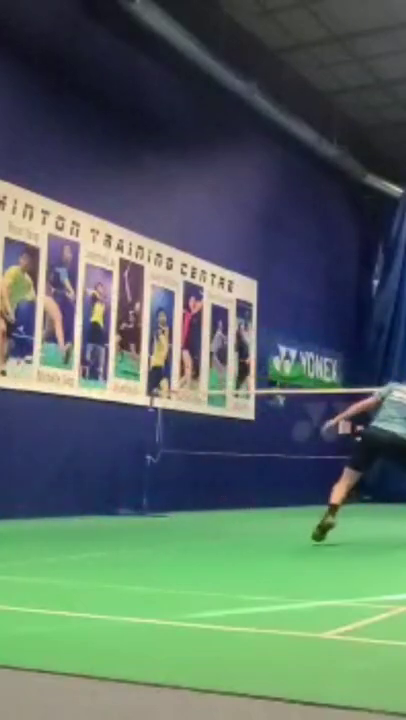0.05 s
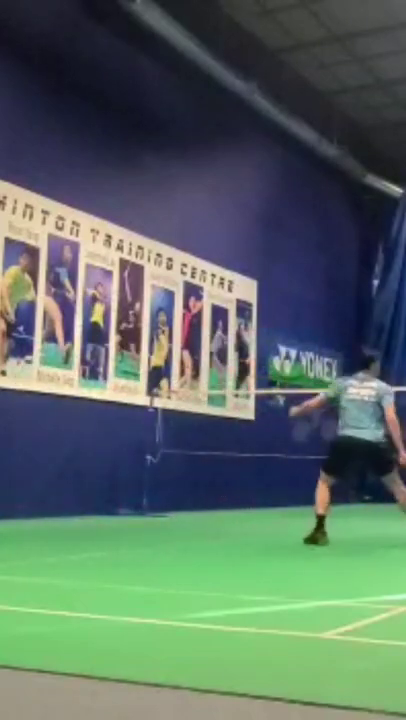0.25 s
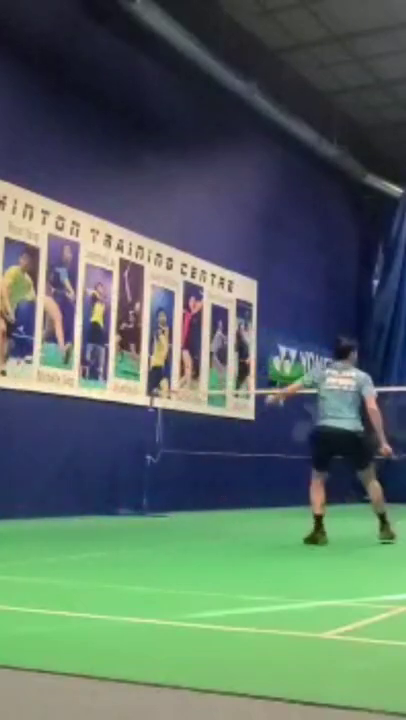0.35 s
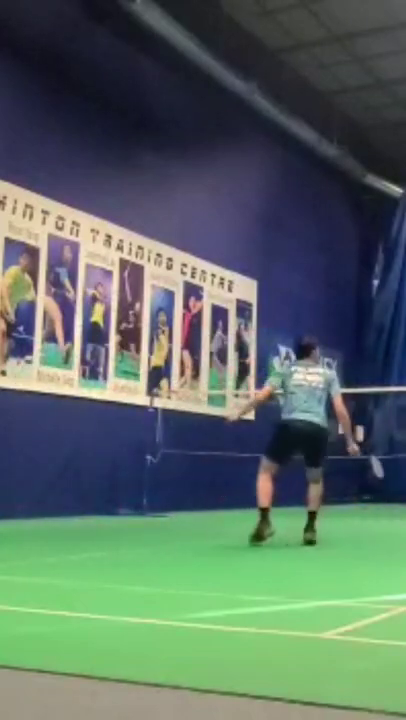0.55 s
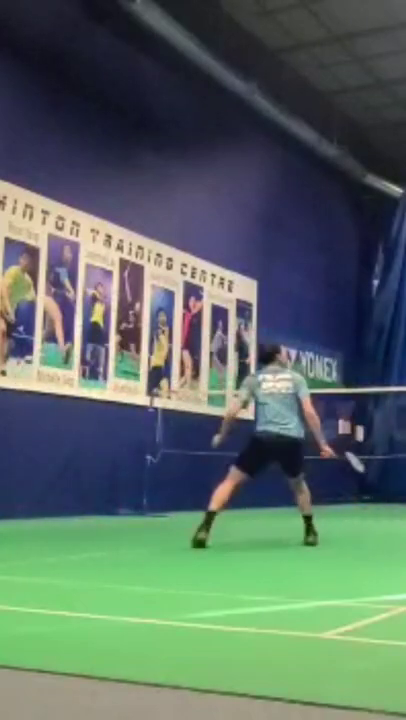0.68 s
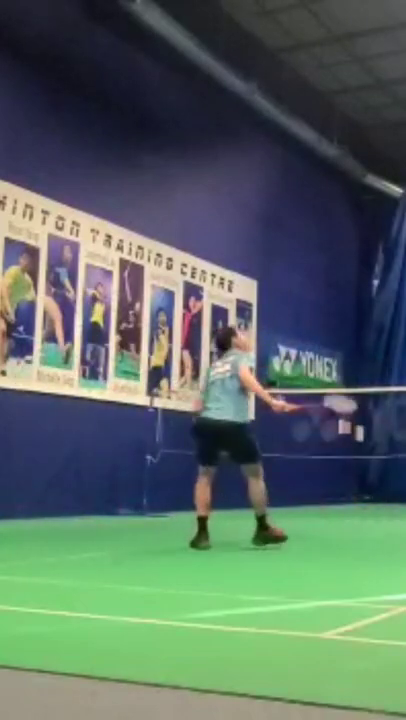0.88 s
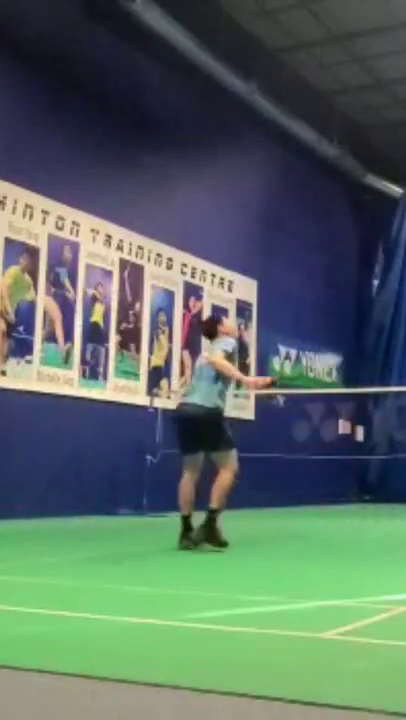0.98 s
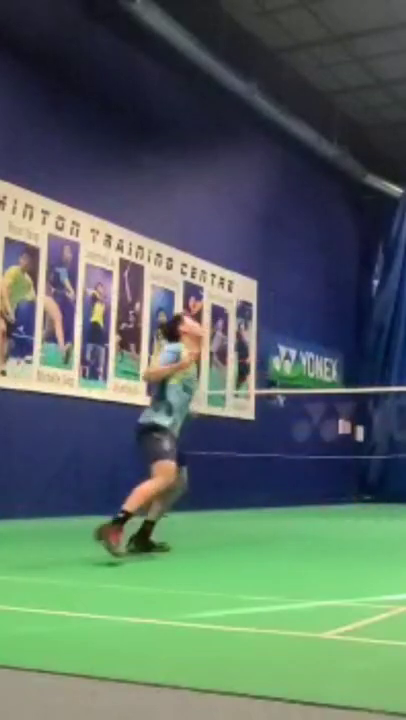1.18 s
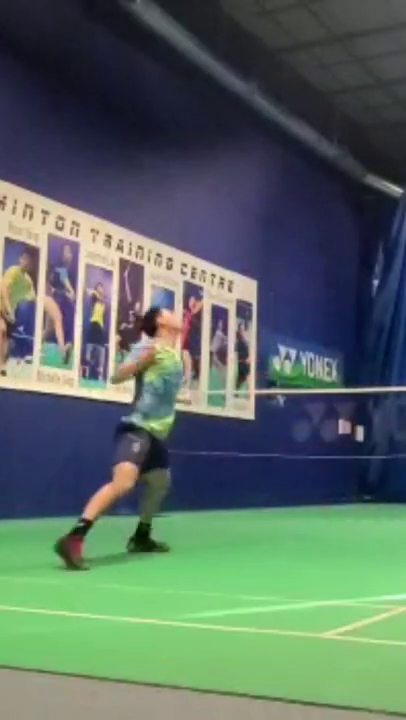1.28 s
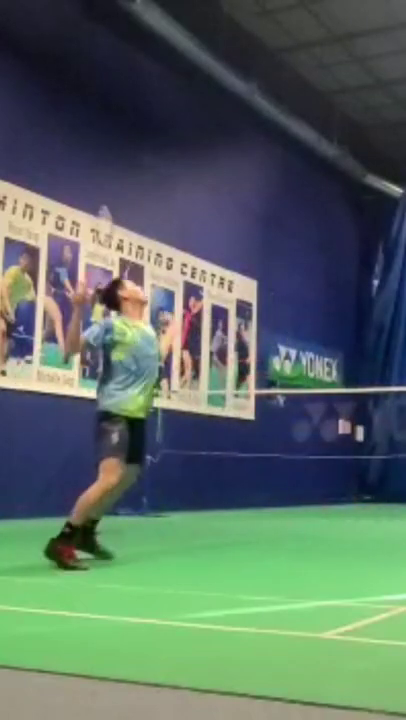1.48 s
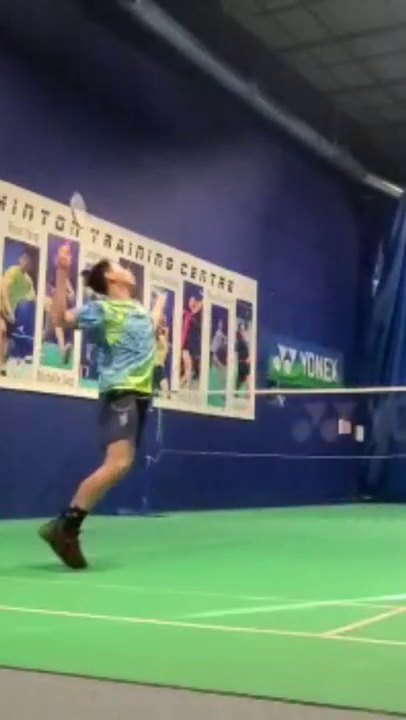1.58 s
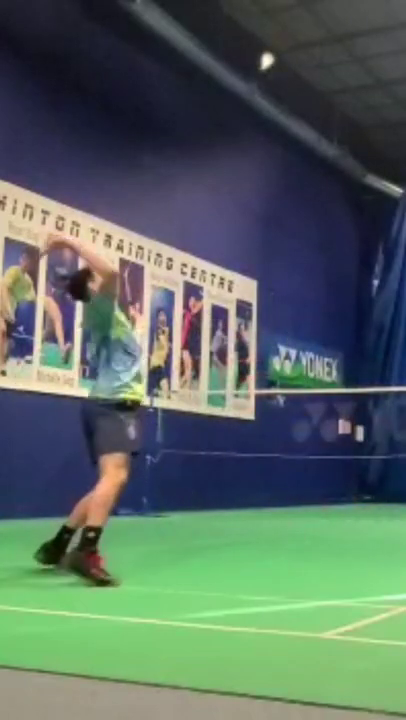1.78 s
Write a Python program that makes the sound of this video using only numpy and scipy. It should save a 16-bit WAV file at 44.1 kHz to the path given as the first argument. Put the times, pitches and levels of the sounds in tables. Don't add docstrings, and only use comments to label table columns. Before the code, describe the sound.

A badminton player's shoes squeak and thud in a reverberant hall; a far racket taps a shuttle between the two squeaks, over low air hum, picked up by a small stereo microphone at courtside.

```python
import sys
import numpy as np
from scipy import signal
from scipy.fft import rfft, irfft, next_fast_len
from scipy.io import wavfile
from scipy.ndimage import uniform_filter1d

SR = 44100
rng = np.random.default_rng(int(sys.argv[2]) if len(sys.argv) > 2 else 0)


def gain_from_db(level_db):
    decades = np.asarray(level_db, float) / 20
    return 10 ** decades


def pcm_store(signal):
    levels = np.round(np.clip(np.atleast_2d(signal), -1, 1) * 32767)
    wavfile.write(sys.argv[1], SR, levels.astype(np.int16).T)


N = 81585


def evened(x):
    return x / np.sqrt(np.mean(x ** 2) + 1e-20)


def read(points, hz):
    f, value = np.transpose(points)
    return np.interp(np.log(hz + 1), np.log(f + 1), value)


def coloured(x, db_at):
    size = next_fast_len(x.shape[1] + 2048)
    gain = gain_from_db(db_at(np.fft.rfftfreq(size, 1 / SR)))
    return irfft(rfft(x, size) * gain, size)[:, :x.shape[1]]


def resonate(x, hz, width_hz):
    return signal.lfilter(*signal.iirpeak(min(hz, SR / 2.2), hz / width_hz, SR), x)


def add(mix, start_s, sound):
    part = mix[:, max(round(start_s * SR), 0):][:, :sound.shape[1]]
    part += sound[:, :part.shape[1]]


def placed(x, pan_db, hall_db, late_samples=0):
    gains_db = np.array([[pan_db / 2], [-pan_db / 2], [hall_db]])
    return np.array([x, np.roll(x, round(late_samples)), x]) * gain_from_db(gains_db)


# [f/Hz, likeness/1]
LIKENESS = [(60, 0.99), (200, 0.82), (500, 0.55), (1000, .1), (3000, 0.081)]


def paired(z, hz):
    same = np.clip(read(LIKENESS, hz), 0, 1)[:, None]
    return np.array([z[0], same * z[0] + np.sqrt(1 - same ** 2) * z[1]])


# [f/Hz, density/dB per Hz]
AIR_SPECTRUM = [(20, -4.5), (70, -5.5), (130, -12.5), (190, -17), (400, -16.5), (1040, -21.5), (2400, -22),
                (4500, -34.5), (14000, -60)]
# [f/Hz, level/dB rms]
HUMS = [(73, -53), (120, -55.5)]


def air():
    level_db, patch_db, hum_width_hz = -45.5, 2.3, 3
    frames, hz = N // 512 + 5, np.fft.rfftfreq(2048, 1 / SR)
    a, b, c, d, patches = rng.standard_normal((frames, 1025, 5)).T
    patches = evened(uniform_filter1d(uniform_filter1d(patches, 12, 0), 8, 1))
    z = paired(np.array([a + 1j * b, c + 1j * d]), hz)
    z = z * gain_from_db(read(AIR_SPECTRUM, hz)[:, None] + patch_db * patches)
    out = gain_from_db(level_db) * evened(signal.istft(z, nperseg=2048, noverlap=1536)[1][:, :N])
    for f, db in HUMS:
        out += gain_from_db(db) * evened(resonate(rng.standard_normal(N), f, hum_width_hz))
    return out


def squeak(curve, tones, feel):
    wobble_share, grit_db = .004, -38
    rasp, pan_db, hall_db, late_samples = feel
    s, hz, db, bite_db = np.transpose(curve)
    t = np.arange(s[0], s[-1], 1 / SR)
    chance = rng.standard_normal((3, 8000))
    wobble = evened(uniform_filter1d(uniform_filter1d(chance[0], 60), 60))[:len(t)]
    flutter = rasp * evened(uniform_filter1d(chance[2], size=24))[:len(t)]
    slip_hz = np.interp(t, s, hz) * (1 + wobble_share * wobble)
    phase = 2 * np.pi * np.cumsum(slip_hz) / SR + 0.27 * flutter
    overtones = sum(gain_from_db(d) * np.sin((k + 2) * phase) for k, d in enumerate(tones))
    x = np.sin(phase) + gain_from_db(np.interp(t, s, bite_db)) * overtones
    x += gain_from_db(grit_db) * chance[1, :len(t)]
    return s[0], placed(np.sqrt(2) * gain_from_db(np.interp(t, s, db)) * x, pan_db, hall_db, late_samples)


# [t/s, stick-slip f/Hz, level/dB, bite on overtones/dB]
SLIP_EARLIER = [(0, 1185, -58, 0), (.04, 1185, -60, 0), (.06, 1185, -85, 0)]
SLIP_FIRST = [(.206, 2263, -75, 8), (.214, 2340, -34.5, 3), (.2235, 2375, -12, -2), (.2252, 2435, -15, -5),
              (.228, 2579, -11, 6.5), (.232, 2580, -27.5, 8), (.237, 2500, -25.5, -1),
              (.243, 2540, -63, -8)]
SLIP_FAR = [(.655, 1850, -72, 0), (.665, 1919, -48, 0.74), (.70, 1941, -53, 0.39), (.71, 1930, -98, 0)]
SLIP_HEEL = [(1.176, 1983, -85, 0.24), (1.180, 1947, -41, 0.29), (1.189, 1955, -32.5, -1),
             (1.195, 1935, -70, -0.13)]
SLIP_SECOND = [(1.180, 2553, -76, -3), (1.184, 2514, -20.5, -5.5), (1.192, 2332, -34, -15),
               (1.210, 2345, -24.5, -5.5), (1.224, 2557, -18.5, -1), (1.234, 2742, -23, -1),
               (1.255, 2796, -28.5, -2.5), (1.266, 2800, -32.5, -9), (1.276, 2900, -75, 3)]
TONES_FIRST = [-16, -26, -34, -40]
TONES_FAINT = [-13, -45, -61, -72]
TONES_OF_HEEL = [-1.5, -3.5, -11.5, -30]
TONES_SECOND = [-5, -14, -15, -16.5]
# [rasp/1, left over right/dB, hall/dB, right late/samples]
FEEL_EARLIER = (0.6, 8, 8.5, 9)
FEEL_FIRST = (0.16, 3.2, 0.8, 0)
FEEL_OF_FAR = (1.8, -1, 10, 1)
FEEL_OF_HEEL = (0.65, 7, 0, 7)
FEEL_SECOND = (0.25, 11, 4.94, 6)


def squeaks():
    return [squeak(SLIP_EARLIER, TONES_FAINT, FEEL_EARLIER),
            squeak(SLIP_FIRST, TONES_FIRST, FEEL_FIRST),
            squeak(SLIP_FAR, TONES_FAINT, FEEL_OF_FAR),
            squeak(SLIP_HEEL, TONES_OF_HEEL, FEEL_OF_HEEL),
            squeak(SLIP_SECOND, TONES_SECOND, FEEL_SECOND)]


# [t/s, length/s, level/dB, centre f/Hz]
SCUFF_EVENTS = [
    (0.2, 0.051, -55, 7600),
    (0.642, 0.041, -53, 6000),
    (0.81, 0.05, -69, 11000),
    (1.031, 0.066, -73, 10300),
    (1.185, 0.032, -45, 5000),
    (1.605, 0.24, -60.5, 10500),
]


def scuff(start_s, length_s, db, hz):
    width_hz, pan_db, hall_db = 15000, 2.5, 7.5
    grit = rng.standard_normal(12000) * gain_from_db(1.7 * rng.standard_normal(12000))
    hiss = evened(resonate(resonate(grit, hz, width_hz), hz, width_hz))
    u = np.minimum(np.arange(12000) / SR / length_s, 1)
    return start_s, placed(gain_from_db(db) * np.sin(np.pi * u ** 0.48) ** 2 * hiss, pan_db, hall_db)


# [t/s, level/dB, body f/Hz, hall/dB]
FOOTFALLS = [
    (.288, -32.5, 600, 9),
    (.308, -31, 352, 3),
    (.345, -38.5, 740, 11),
    (.74, -33.5, 430, 6),
    (1.172, -51, 195, -18),
    (1.387, -40, 230, 0),
    (1.421, -31.5, 699, 4.5),
    (1.504, -34, 768, -6),
    (1.762, -42, 324, 6),
]


def thud(start_s, db, hz, hall_db):
    cycles, puff_db = 1.41, -8.5
    u = np.arange(2000) / SR * hz / cycles
    puff = gain_from_db(puff_db) * evened(resonate(rng.standard_normal(2000), 1.2 * hz, 1.7 * hz))
    swell = np.e * 3.06 * u * np.exp(-3.0 * u)
    return start_s, placed(gain_from_db(db) * swell * (np.sin(2 * np.pi * cycles * u) + puff), 0, hall_db)


# [f/Hz, level/dB, t60/s]
STRING_MODES = [(402, -7.5, 0.028), (760, -10, 0.019), (1247, -14.5, .04), (4280, -9, 0.0067)]


def knock():
    start_s, db, hall_db = .6352, -23.5, 8.5
    push_s, tick_db, tick_t60_s = 0.00031, -11.5, .012
    t = np.arange(3000) / SR
    u = t / push_s
    x = np.e * u * (1 - u / 2) * np.exp(-u) * 1.65
    x += gain_from_db(tick_db - 60 * t / tick_t60_s) * rng.standard_normal(3000)
    for f, mode_db, t60_s in STRING_MODES:
        x += gain_from_db(mode_db - 60 * t / t60_s) * np.sin(2 * np.pi * f * t)
    return start_s, placed(gain_from_db(db) * x, 0, hall_db)


# [delay t/s, left level/dB, right level/dB]
WALL_ECHOES = [(.0115, -15, -11), (.0190, -2, -6), (.0215, -9, -13), (.033, -13, -6), (.046, -12, -13)]
# [f/Hz, t60/s]
HALL_DECAY = [(120, 0.59), (500, 0.86), (1500, 1.49), (2500, 1.556), (5000, 1.317), (8000, 0.82),
              (13000, 0.2)]
# [f/Hz, level/dB]
WALL_COLOUR = [(100, -11), (300, -0.5), (2500, 1), (6000, 0.5), (13000, 3)]


def hall(mix):
    echo_top_hz, build_s = 5000, 0.011
    early = np.zeros((2, 4000))
    for delay_s, left_db, right_db in WALL_ECHOES:
        early[:, round(delay_s * SR)] += gain_from_db(np.array([left_db, right_db]))
    echoes = signal.fftconvolve(mix[:2].mean(0)[None], early, axes=1)[:, :N]
    dulled = coloured(echoes, lambda f: -10 * np.log10(1 + (f / echo_top_hz) ** 2))
    build = 1 - np.exp(-(np.arange(2 * SR) / SR / build_s) ** 2)
    hz, t, z = signal.stft(rng.standard_normal((2, 2 * SR)) * build, SR, nperseg=512)
    decay = gain_from_db(-60 * t / read(HALL_DECAY, hz)[:, None])
    tail = signal.istft(paired(z, hz) * decay, SR, nperseg=512)[1]
    wet = signal.fftconvolve(mix[2:], tail / np.linalg.norm(tail[0]), axes=1)[:, :N]
    return mix[:2] + dulled + coloured(wet, lambda f: read(WALL_COLOUR, f))


def scene():
    contacts = squeaks() + [scuff(*row) for row in SCUFF_EVENTS]
    contacts += [thud(*row) for row in FOOTFALLS] + [knock()]
    mix = np.zeros((3, N))
    for start_s, sound in contacts:
        add(mix, start_s, sound)
    return hall(mix) + air()


def band_limit(x):
    return signal.sosfilt(signal.butter(12, 15110, fs=SR, output="sos"), x)


# [f/Hz, left over right/dB]
PORT_LEAN = [(60, -0.5), (150, -1.0), (370, 0), (930, 0.5), (2330, 0), (5810, 4), (14500, 1.5)]


def record(dry):
    top_hz, duck_from_hz, duck_to_hz = 14000, 140, 1700
    duck_db, duck_share, recover_db_per_s = -39, 0.3, 77.5
    x = coloured(dry, lambda f: np.outer([.5, -.5], read(PORT_LEAN, f)) - 10 * np.log10(1 + (f / top_hz) ** 60))
    low = coloured(x, lambda f: -20 * np.log10(1 + (duck_from_hz / (f + 1)) ** 6 + (f / duck_to_hz) ** 12))
    treble = coloured(x, lambda f: -20 * np.log10(1 + (4000 / (f + 1)) ** 12))
    power_db = 10 * np.log10(abs(uniform_filter1d((treble ** 2).mean(0), size=2000)) + 1e-12)
    fall_db = np.arange(N) * recover_db_per_s / SR
    held_db = np.maximum.accumulate(power_db + fall_db) - fall_db
    over_db = np.maximum(held_db - duck_db, 0)
    ducked = low / gain_from_db(duck_share * uniform_filter1d(over_db, size=400))
    return band_limit(x - low + ducked)


dry = scene()
out = record(dry)
pcm_store(out)
```